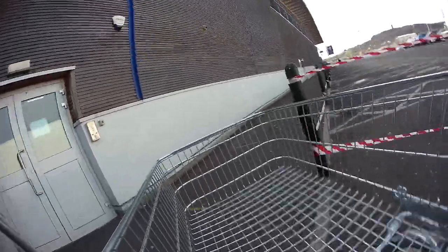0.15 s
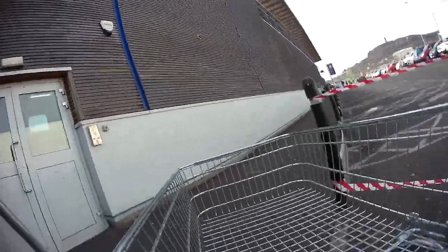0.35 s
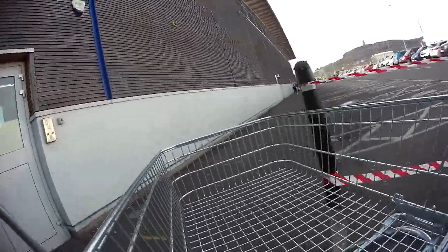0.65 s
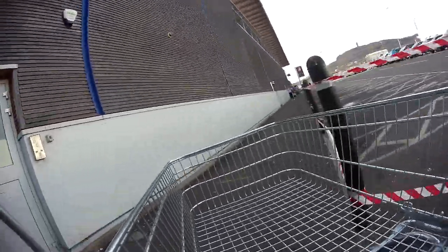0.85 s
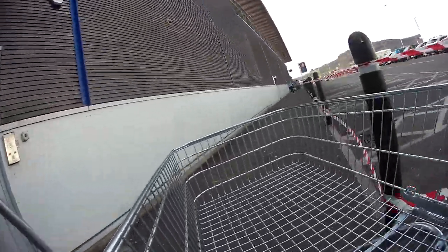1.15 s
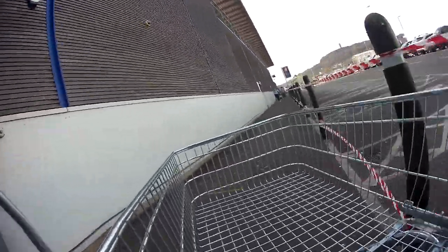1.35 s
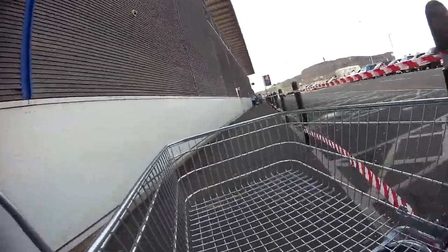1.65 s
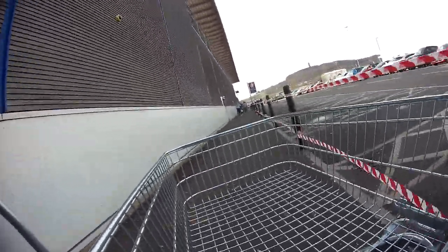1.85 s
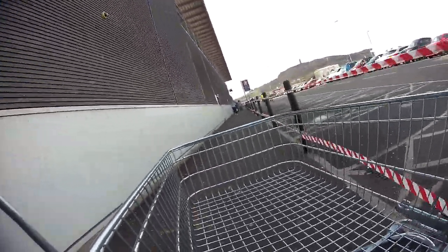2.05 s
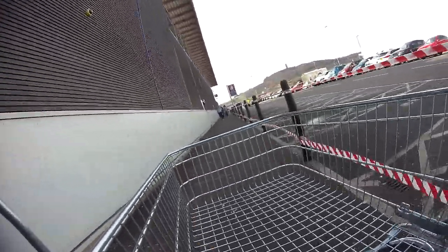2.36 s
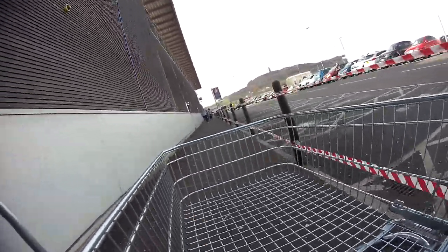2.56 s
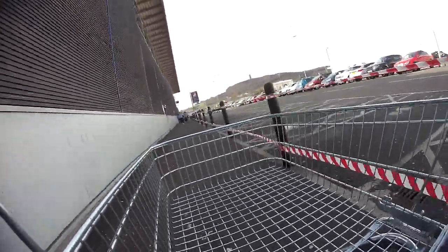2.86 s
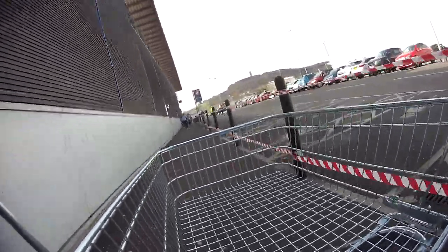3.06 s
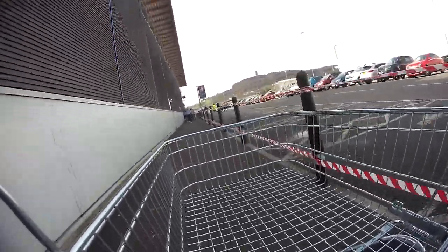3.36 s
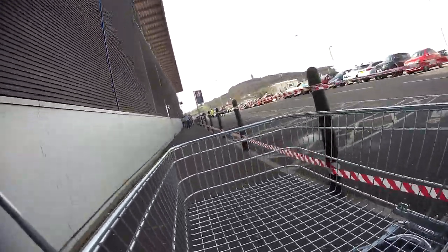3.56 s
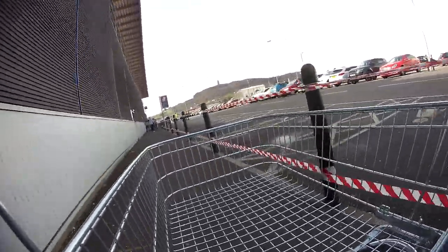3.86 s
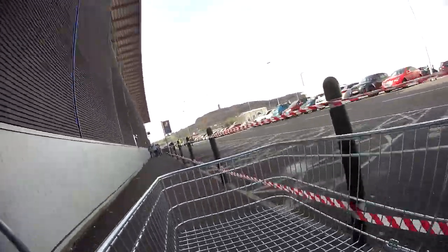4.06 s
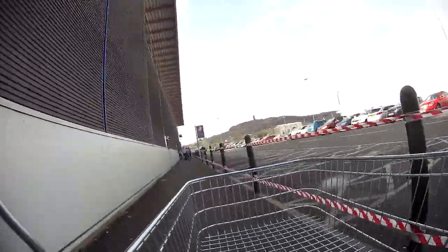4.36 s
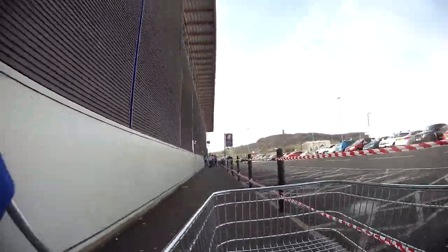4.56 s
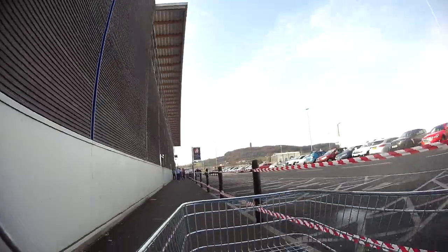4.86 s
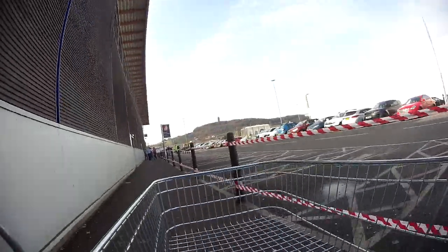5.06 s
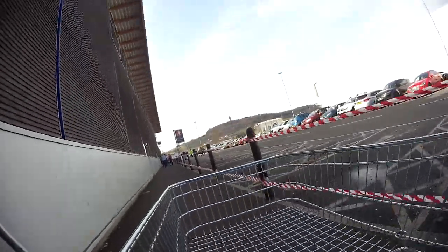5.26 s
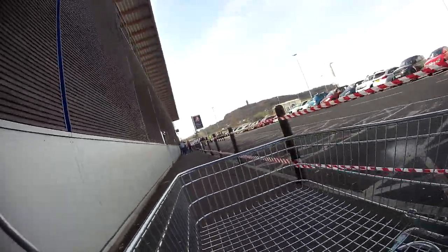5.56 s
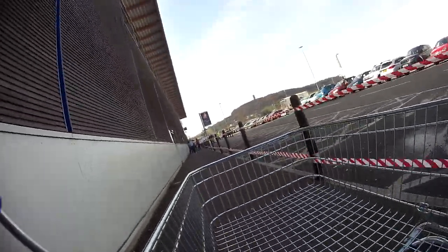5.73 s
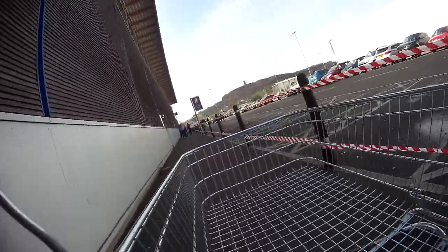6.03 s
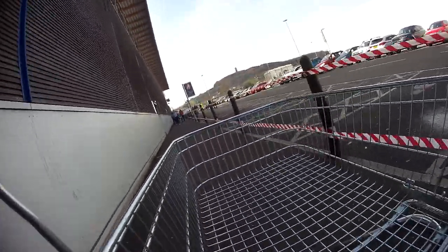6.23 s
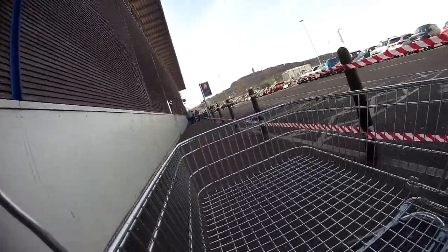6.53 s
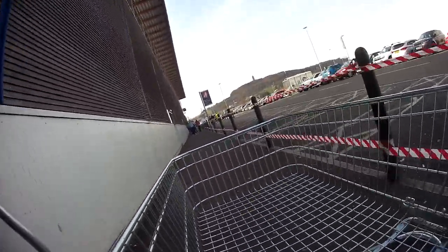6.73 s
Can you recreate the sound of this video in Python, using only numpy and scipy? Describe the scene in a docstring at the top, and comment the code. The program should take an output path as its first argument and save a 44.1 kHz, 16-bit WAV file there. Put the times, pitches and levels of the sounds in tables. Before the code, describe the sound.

An empty wire shopping trolley rolls over tarmac in an open car park, heard from the handle without echo. Throughout, faint grit crunches under the castors, with a low frame rumble and light tinkling from the basket. From 0.6 seconds a loose fitting right beside the microphone strikes in sharp, bright clacks with a short hollow ring, joined by buzzing chatter. The clacks come in irregular clusters, hardest at about 1.5 seconds, where they overload, and strong again near 1.2, 1.8, 2.2 and 3 seconds, some with a dull thump. A short dry scrape comes just before 3 seconds. Lighter, dense chatter continues until about 4 seconds, then stops. The rolling carries on quietly, with a castor twittering faintly between 4 and 5 seconds. A dull, close knock lands at 5.4 seconds and a few more between 6.2 and 6.4, among soft steering scuffs that last until about 6.7.

```python
"""Grit crunches faintly under castors, swelling once a turn, and keeps a wire basket tinkling:
an empty trolley pushed over tarmac in an open car park, heard from a small camera at its handle.
The frame rumbles, a castor twitters, the steering scuffs. On rough ground a loose fitting right
beside the microphone clacks and chatters against the housing, hard enough to overload it.
On the smoother stretch only a few dull knocks of the padded mount rise above the rolling."""
import sys
import numpy as np
from scipy import signal
from scipy.fft import rfft, irfft, next_fast_len
from scipy.io import wavfile
from scipy.ndimage import uniform_filter1d

SR = 44100
rng = np.random.default_rng(int(sys.argv[2]) if len(sys.argv) > 2 else 0)


def put_to_file(sound):
    """Save the sound as 16-bit audio at rate SR, in the file named by the first command-line argument."""
    columns = np.atleast_2d(sound).T  # one column per channel
    safe = np.clip(columns, -1, 1)
    whole_steps = np.round(safe * 32767)
    wavfile.write(sys.argv[1], SR, whole_steps.astype(np.int16))


N = 303849

# the wheels on the tarmac, below the microphone: t/s, grit level/dB, rumble level/dB
ROLLING_LEVELS = [(0.0, -60, -60), (0.48, -49, -53), (0.6, -57, -54), (1.04, -48, -51), (1.16, -58, -55),
                  (1.44, -52, -53), (2.59, -54, -54), (2.71, -54, -45), (4.03, -54, -47), (4.15, -50, -54),
                  (4.43, -58, -59), (4.95, -54, -60), (5.07, -63, -62), (5.59, -57, -48), (5.99, -62, -62),
                  (6.27, -59, -52), (6.59, -60, -59), (6.89, -57, -54)]
# spectrum of the grit under the wheels: f/Hz, level/dB
GRIT_SPECTRUM = [(200, -16.5), (400, -5), (720, -1), (1250, -9), (1660, -1), (2350, -8.5), (2950, -22.5),
                 (3400, -12.5), (4100, -7.5), (6000, -6.5), (8000, -11.5), (10500, -29.5), (13000, -53.5),
                 (15000, -79)]
# spectrum of the frame's rumble: f/Hz, level/dB
RUMBLE_SPECTRUM = [(20, -13), (38, -1.5), (90, 0), (170, -3), (330, -5.5), (600, -15), (1200, -17),
                   (3000, -66)]
# modes of the basket wires: f/Hz, t60/s, level/dB
WIRE_MODES = [(2670, 0.023, -4.5), (2975, 0.012, 1), (3950, 0.28, -15), (4440, 0.013, -4.5),
              (5650, 0.0045, 5.5), (6280, 0.021, 0), (7500, .005, -17.5)]
# spells in which a castor twitters: middle t/s, length/s, level/dB
TWITTER_SPELLS = [(0.3, .15, -64), (4.15, .25, -60), (4.8, 0.78, -61)]
# dry scrapes: middle t/s, length/s, level/dB
SCUFF_SPELLS = [(0.868, 0.058, -45), (2.82, 0.012, -39), (2.95, 0.016, -30), (5.311, 0.072, -44.5),
                (6.134, 0.23, -48.5), (6.303, 0.077, -44.5), (6.64, 0.16, -42)]
# spectrum of the scrapes: f/Hz, level/dB
SCUFF_SPECTRUM = [(100, -22), (330, 1.5), (700, 3.5), (1250, -5), (1650, 2), (2500, -5), (4000, -7),
                  (6000, 1.5), (8000, -10), (11000, -29)]
# knocks of the camera mount: t/s, peak level/dB, stiffness of the padding (1 = usual)
MOUNT_KNOCKS = [(1.467, -16.5, 0.58), (2.1711, -15.5, 0.83), (2.9856, -17, 0.92), (5.373, -10, 1.12),
                (5.688, -31.5, 0.55), (6.1634, -12, 1.13), (6.2372, -20.5, 1.01), (6.3750, -13.5, 1.19),
                (6.399, -20, 1.08)]
# modes of the padded mount: f/Hz, t60/s, level/dB
MOUNT_MODES = [(133, 0.0029, -31), (285, 0.024, 7), (376, 0.016, -0.5), (522, 0.058, -6),
               (930, 0.033, -8.5), (1730, .02, -3)]
# modes of the housing, struck hard: f/Hz, t60/s, level/dB
HOUSING_MODES = [(90, 0.0042, -35.5), (267, 0.023, 3.5), (533, 0.036, -3.5), (597.5, 0.019, 6.5),
                 (737, 0.035, -7), (849, 0.026, 1), (989, 0.06, -52), (1546, 0.019, -2)]
# the housing's hollow note, which hangs on after each strike: f/Hz, t60/s, level/dB
HOLLOW_NOTE = [(618.5, 0.041, -11)]
# bouts in which the loose fitting keeps buzzing: start t/s, length/s, level/dB
BUZZ_BOUTS = [(0.681, 0.039, -41.5), (1.206, 0.065, -49.5), (1.623, 0.11, -49.5), (1.716, 0.044, -43),
              (1.795, 0.028, -61), (2.112, 0.0071, -41.5), (2.175, 0.14, -46.5), (2.296, 0.083, -43.5),
              (2.738, 0.326, -44.5), (3.149, 0.55, -43), (3.804, 0.078, -42.5), (3.966, 0.12, -52.5)]
# strikes of the loose fitting: t/s, strength/dB
FITTING_STRIKES = [(0.5996, 9), (0.641, -13.5), (0.6698, 9.5), (0.6853, -7.5), (0.6982, 9), (0.7789, 3),
                   (1.1638, 5), (1.2099, 19.5), (1.2514, -7), (1.2592, -10), (1.4304, 9.5), (1.4658, 28.5),
                   (1.4965, 1.5), (1.5378, 15), (1.5821, 12.5), (1.6151, -8), (1.6315, 12), (1.6658, 15.5),
                   (1.6807, -9.5), (1.6954, -4), (1.7053, -7), (1.7972, 17), (1.8135, -19), (1.8332, 1),
                   (1.8713, -9.5), (2.0537, -8), (2.1153, 5), (2.1693, 21), (2.1996, 6), (2.231, -8.5),
                   (2.4039, -4.5), (2.4278, 1), (2.4792, 9), (2.6731, -5.5), (2.7009, 9.5), (2.7355, 16),
                   (2.762, 1), (2.7749, 4), (2.8487, 5.5), (2.865, -15), (2.8844, -1), (2.9847, 20),
                   (3.0581, 4.5), (3.0945, -10), (3.1169, 6), (3.1272, -2), (3.1523, 6.5), (3.161, -3.5),
                   (3.2321, -9.5), (3.252, 5), (3.2909, -16), (3.3209, 4), (3.3802, -7.5), (3.445, 6),
                   (3.478, -10), (3.5593, -1), (3.6516, 9.5), (3.6711, -8), (3.6818, -1.5), (3.764, 4.5),
                   (3.7843, 9), (3.822, 1.5), (3.839, -4), (3.878, -5), (3.8972, -9.5), (3.9476, -6),
                   (3.9602, -2), (4.0047, 7), (4.0203, -8.5)]


def undb(db):
    """Decibels to gain."""
    return 10 ** (np.asarray(db) / 20)


def unit(x):
    """Scale to rms 1."""
    return x / np.sqrt(np.mean(x ** 2))


def peak(x):
    """Scale to peak 1."""
    return x / np.abs(x).max()


def add(track, s, x):
    """Mix a sound in at time s."""
    i = int(s * SR)
    track[i:i + len(x)] += x[:N - i]


def curve(table, column):
    """One column of a time table, at every sample."""
    rows = np.array(table, float)
    return np.interp(np.arange(N) / SR, rows[:, 0], rows[:, column])


def swells(spells):
    """Gain that swells and fades once in each spell."""
    out = np.zeros(N)
    for middle, length, db in spells:
        add(out, max(middle - length / 2, 0), undb(db) * np.sqrt(np.hanning(int(length * SR))))
    return out


def wander(hz):
    """Glide between random values, hz of them a second; rms 1."""
    step = int(SR / hz)
    held = np.repeat(rng.standard_normal(N // step + 1), step)
    return unit(uniform_filter1d(held, step)[:N])


def impacts(per_s, spread_db, limit_db):
    """Tiny random impacts, most faint and a few strong."""
    chance, size, sign = rng.random(N), rng.exponential(size=N), rng.choice([-1, 1], N)
    return (chance < per_s / SR) * sign * undb(np.minimum(spread_db * size, limit_db))


def soften(x, hz):
    """Two-pole low-pass."""
    return signal.sosfilt(signal.butter(2, hz, fs=SR, output="sos"), x)


def resonate(x, hz, width_hz):
    """One resonance, gain 1 at its centre."""
    return signal.lfilter(*signal.iirpeak(hz, hz / width_hz, SR), x)


def colour(x, spectrum):
    """Minimum-phase filter with the given spectrum, so clicks keep their sharp fronts."""
    hz, db = np.transpose(spectrum)
    size = next_fast_len(N + SR // 10, True) // 2 * 2
    freq = np.maximum(np.arange(size // 2 + 1) * SR / size, 1)
    gain = undb(np.interp(np.log(freq), np.log(hz), db))
    cepstrum = irfft(np.log(gain))
    cepstrum[1:size // 2] *= 2
    cepstrum[size // 2 + 1:] = 0
    return irfft(rfft(x, size) * np.exp(rfft(cepstrum)))[:N]


def ring(modes, size, stiffness=1):
    """Decaying modes after one blow; stiffness scales their pitch."""
    hz, t60, db = np.array(modes, float).T[:, :, None]
    t = np.arange(size) / SR
    decay = np.exp(-np.log(1000) * t / t60)
    return np.sum(undb(db) * np.cos(2 * np.pi * hz * stiffness * t) * decay, axis=0)


def press(x, contact_ms):
    """Spread a blow over its contact time: longer is duller. Peak 1."""
    width = contact_ms * SR / 1000
    phase = np.minimum(np.arange(int(width) + 2) / width, 1)
    return peak(np.convolve(x, np.sin(np.pi * phase) ** 2))


def tread_db(turn_hz=3.27, slowing_hz_per_s=.04, depth_db=1.5):
    """The crunch eases each time the worn side of the tread comes round; the wheel gradually slows."""
    t = np.arange(N) / SR - 0.18  # the worn side first meets the ground at 0.18 s
    turns = turn_hz * t - slowing_hz_per_s * t ** 2 / 2
    return -depth_db * np.cos(2 * np.pi * turns)


def basket():
    """Each basket wire is jolted at its own random moments and gives a short ping."""
    out = np.zeros(N)
    for hz, t60, db in WIRE_MODES:
        jolts = impacts(per_s=150, spread_db=5, limit_db=20)
        ping = ring([(hz, t60, 0)], size=int(SR * t60))
        out += undb(db) * unit(signal.fftconvolve(jolts, ping)[:N])
    return soften(out, hz=7500)


def wheels():
    """Down on the tarmac, grit crackles under the castors, shakes the basket and rumbles the frame."""
    stones = unit(impacts(per_s=150, spread_db=4.8, limit_db=15))
    rough_db, bumps_db = 2.3 * wander(hz=24), 2.2 * wander(hz=14)
    grit = unit(colour(stones + undb(-2.5) * rng.standard_normal(N), GRIT_SPECTRUM))
    rumble = unit(colour(rng.standard_normal(N), RUMBLE_SPECTRUM))
    crunch_gain = undb(curve(ROLLING_LEVELS, column=1) + tread_db() + rough_db)
    rumble_gain = undb(curve(ROLLING_LEVELS, column=2) + bumps_db + 1.5)
    return crunch_gain * (grit + undb(-3) * basket()) + rumble_gain * rumble


def twitters(hz=2950, width_hz=370):
    """A castor sticks and slips, each slip a tiny chirp."""
    slips = impacts(per_s=50, spread_db=4, limit_db=10)
    chirps = resonate(resonate(slips, hz, width_hz), hz, width_hz)
    return swells(TWITTER_SPELLS) * unit(chirps)


def scuffs():
    """Short dry scrapes swell and fade as the trolley is steered."""
    rub = impacts(per_s=4000, spread_db=3, limit_db=12) * undb(2 * wander(hz=60))
    return swells(SCUFF_SPELLS) * unit(colour(rub, SCUFF_SPECTRUM))


def cavity(x, shift=1, damping=1):
    """The small air cavity at the microphone rings brightly for about a millisecond."""
    narrow = resonate(x, hz=5560 * shift, width_hz=850 * damping)
    return soften(resonate(narrow, hz=5750 * shift, width_hz=1900 * damping), hz=7600)


def mount_knocks(settle_s=.0098):
    """The mount bumps its padding with a tick and a faint scuff; soft padding gives more low push."""
    out, pushes = np.zeros(N), np.zeros(N)
    tick = peak(soften(signal.unit_impulse(SR // 100), hz=4000))
    for s, db, stiffness in MOUNT_KNOCKS:
        modes = ring(MOUNT_MODES, size=4096, stiffness=stiffness)
        bump = undb(db) * press(modes, contact_ms=1.26 / stiffness)
        add(out, s, bump)
        add(out, s + settle_s, undb(-13) * bump)  # a second bump as it settles
        add(out, s, undb(db - 10) * tick)
        push_db = db - 4.5 - 34 * (stiffness - .5)
        add(pushes, s, undb(push_db) * press([1.], contact_ms=4.5))
    scuff = unit(cavity(rng.standard_normal(N), damping=0.71))
    return out * (1 + undb(-13) * scuff) + pushes


def housing(contact_ms, stiffness=1):
    """The housing's answer to one blow; little passes at its antiresonance."""
    hum = press(ring(HOUSING_MODES, size=6144, stiffness=stiffness), contact_ms)
    for notch_hz in (1200, 1370):
        hum = hum - resonate(hum, notch_hz, width_hz=230)
    return peak(hum)


def buzz_gain(attack_s=0.0022, release_s=0.013):
    """Each bout of buzzing starts quickly, holds and dies away."""
    t, gain = np.arange(N) / SR, np.zeros(N)
    for start, length, db in BUZZ_BOUTS:
        attack = np.clip((t - start) / attack_s, 0, 1)
        release = np.exp(-np.clip(t - start - length, 0, 1) / release_s)
        gain = np.maximum(gain, undb(db) * attack * release)
    return gain


def fitting_chatter():
    """The fitting bounces in quick soft taps that keep the housing humming; a few stand out."""
    taps = impacts(per_s=1200, spread_db=2.5, limit_db=8)
    hum = unit(signal.fftconvolve(taps, housing(contact_ms=1.0))[:N])
    high_note = unit(resonate(hum, hz=622, width_hz=30))
    low_note = unit(resonate(hum, hz=262, width_hz=45))
    body = hum + undb(-1.5) * high_note + undb(-11) * low_note
    flicker = undb(5 * wander(hz=70))
    treble = unit(cavity(taps)) + undb(-5) * unit(soften(taps, hz=5000))
    sizzle = unit(treble * flicker)
    single_taps = impacts(per_s=45, spread_db=3, limit_db=6)
    ping = peak(cavity(signal.unit_impulse(SR // 100)))
    patter = signal.fftconvolve(single_taps, ping)[:N]
    return buzz_gain() * (body + undb(-1) * sizzle + undb(19) * patter)


def strikes_and_rebounds(rebound_s=.007, rebound_db=-27.5, scatter_db=3.5):
    """The fitting falls back once, weakly, after each strike. Rows of t/s, strength/dB."""
    hits = np.array(FITTING_STRIKES)
    late, scatter = rng.standard_normal((len(hits), 2)).T
    rebounds = hits + np.transpose([rebound_s * 1.5 ** late, rebound_db + scatter_db * scatter])
    return np.vstack([hits, rebounds])


def fitting_clacks(hollow_limit_db=-18.5, skitter_decay_s=0.0028):
    """Beside the microphone, each strike cracks, rings the cavity and housing and skitters to rest."""
    out, size = np.zeros(N), 4096
    blow, t = signal.unit_impulse(size), np.arange(size) / SR
    crack = undb(-17.5) * peak(soften(blow, hz=4200))
    overtone = undb(-24.5) * peak(resonate(blow, hz=11920, width_hz=880))
    for s, strength_db in strikes_and_rebounds():
        shift, stiffness = 1 + rng.normal(0, [.015, .03])
        force = min(undb(strength_db), 2)
        # hard strikes reach the cavity's overtone, and their strong air motion dies faster
        bright = peak(cavity(blow, shift, damping=1 + 0.051 * force))
        add(out, s, undb(strength_db) * (crack - bright + force * overtone))
        thud_gain = undb(-16.5 + 0.48 * strength_db)  # grows more slowly than the crack
        add(out, s, -thud_gain * housing(contact_ms=0.58, stiffness=stiffness))
        add(out, s, -min(thud_gain, undb(hollow_limit_db)) * ring(HOLLOW_NOTE, size))
        skitter = unit(cavity(rng.standard_normal(size) ** 3, damping=1.5))
        add(out, s, undb(-19) * np.sqrt(force) * skitter * np.exp(-t / skitter_decay_s))
    return out


def scene():
    """One microphone at the handle hears everything directly; the open car park adds no echo."""
    at_microphone = fitting_clacks() + fitting_chatter() + mount_knocks()
    from_trolley = scuffs() + twitters() + wheels()
    return (at_microphone + from_trolley)[None]


def record(dry):
    """The microphone overloads on the hard clacks; the top rolls off and is cut above 16 kHz."""
    ceiling, knee, top_hz = .68, 5, 16000
    clipped = dry / (1 + np.abs(dry / ceiling) ** knee) ** (1 / knee)
    rounded = soften(clipped, hz=12500)
    return signal.sosfilt(signal.ellip(8, .2, 70, top_hz, fs=SR, output="sos"), rounded)


dry = scene()
out = record(dry)
put_to_file(out)
```